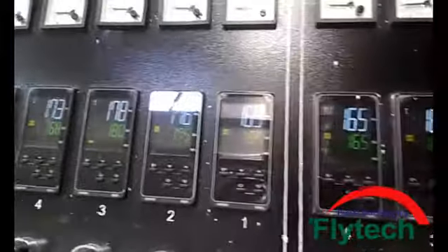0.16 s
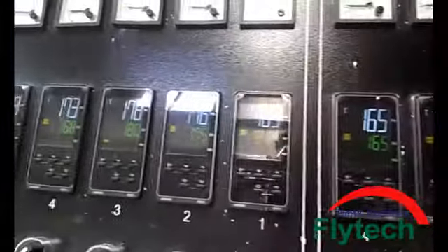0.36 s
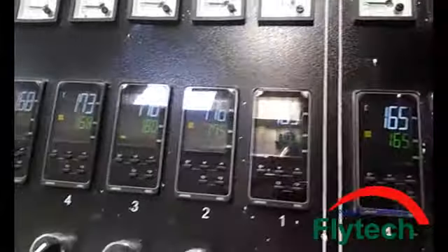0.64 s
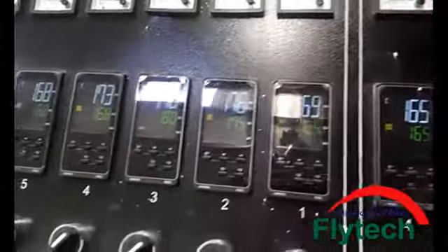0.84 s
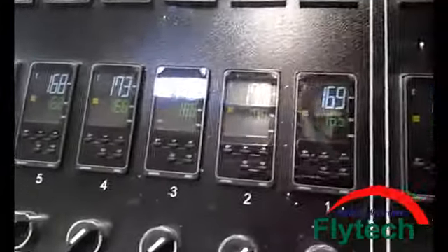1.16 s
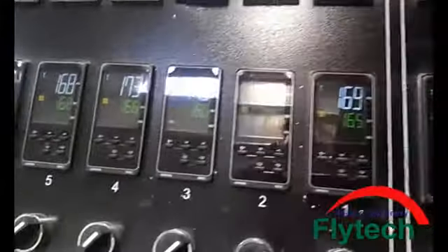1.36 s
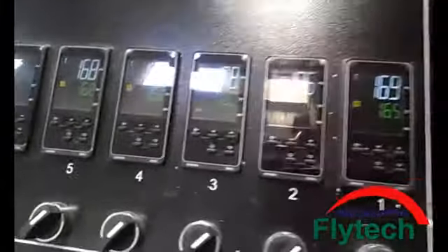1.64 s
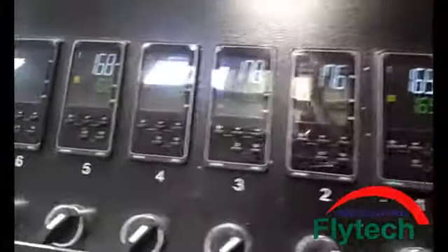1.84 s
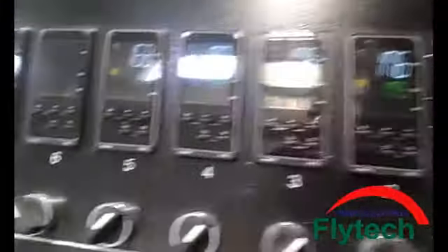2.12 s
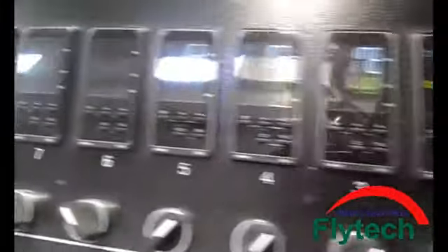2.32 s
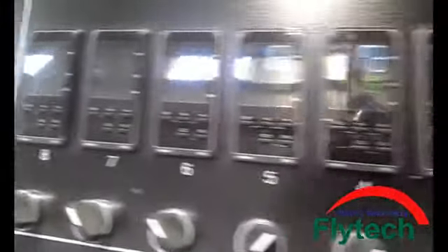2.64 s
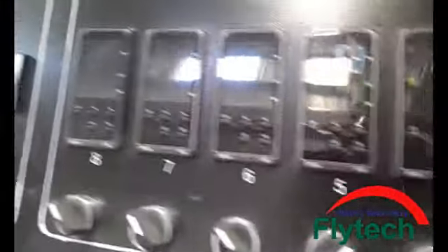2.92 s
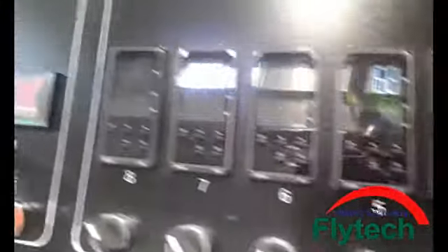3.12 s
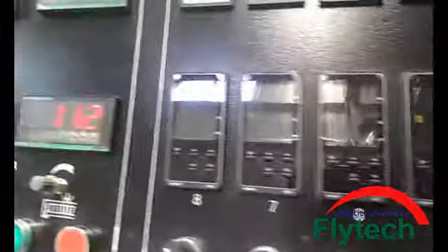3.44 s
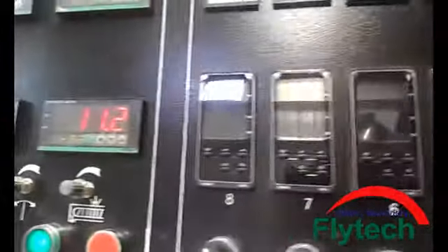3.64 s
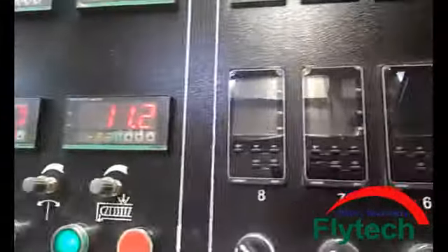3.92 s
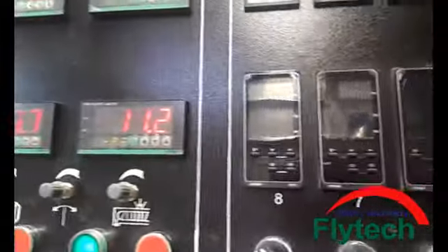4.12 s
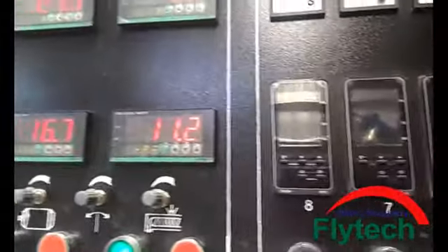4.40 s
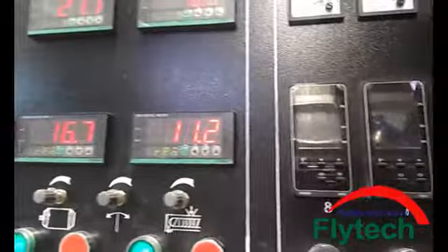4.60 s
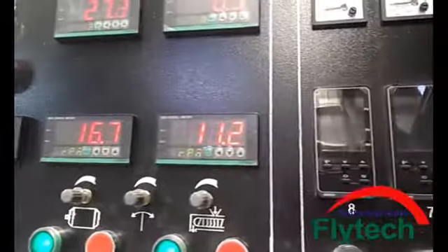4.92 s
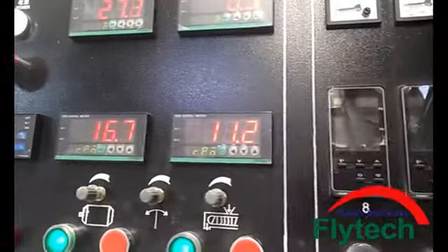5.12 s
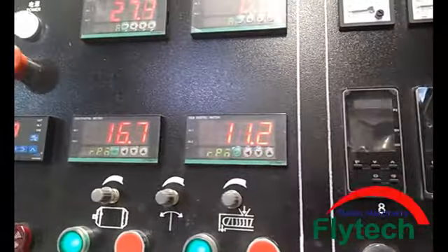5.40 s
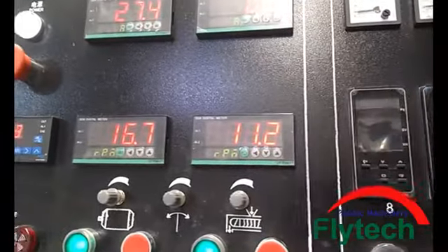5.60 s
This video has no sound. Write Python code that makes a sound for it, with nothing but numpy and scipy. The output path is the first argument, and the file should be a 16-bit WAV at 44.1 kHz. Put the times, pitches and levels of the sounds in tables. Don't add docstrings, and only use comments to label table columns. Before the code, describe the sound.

Continuous industrial noise without a break: a shrill, rough-edged motor whine around four kilohertz dominates, brighter on the right and duller on the left. Its strength ripples, faster once the camera speeds up midway, then more slowly. Fans and gears hum under it with a wide roar. A short, stuttering higher squeak comes close to the end. Camera microphone, slightly compressed, little extreme treble.

```python
import sys
import numpy as np
from scipy import signal
from scipy.fft import rfft, irfft
from scipy.io import wavfile
from scipy.ndimage import uniform_filter1d, minimum_filter1d, map_coordinates

SR = 44100
rng = np.random.default_rng(int(sys.argv[2]) if len(sys.argv) > 2 else 0)


def output_pcm(signal):
    pcm = np.clip(np.atleast_2d(signal).T, -1, 1) * 32767
    wavfile.write(sys.argv[1], SR, np.round(pcm).astype(np.int16))


def ratio_of_db(decibels):
    return 10 ** (np.asarray(decibels, float) / 20)


N = 253575
STEP = 256
T_S = np.arange(0, N, STEP) / SR

SWITCH_HZ, CYCLE_HZ = 4020.3, 42.39
# [order/cycles, left level/dB, right level/dB]
SIDEBANDS = [(-14, -62, -52), (-13, -59, -46), (-12, -55, -43), (-11, -57, -52), (-10, -49, -44),
             (-9, -50, -41), (-8, -58, -41), (-7, -51, -39), (-6, -39, -33), (-5, -47, -41), (-4, -43, -33),
             (-3, -42, -25), (-2, -40, -26), (-1, -35, -27), (0, -23, -18), (1, -40, -30), (2, -35, -21),
             (3, -43, -30), (4, -47, -40), (5, -39, -34), (6, -43, -34), (7, -50, -32), (8, -50, -36),
             (9, -47, -38), (10, -46, -41), (11, -51, -42), (12, -57, -44), (13, -52, -36), (14, -54, -45),
             (15, -53, -47)]
# [order/cycles, left level/dB, right level/dB]
ROTOR_SIDEBANDS = [(-10.25, -51, -46), (-7.25, -60, -45), (-6.75, -59, -46), (-6.25, -55, -46),
                   (-4.25, -52, -45), (-3.75, -54, -41), (-3.5, -61, -42), (-3.25, -52, -35),
                   (-2.75, -54, -36), (-2.5, -57, -39), (-2.25, -62, -42), (-1.75, -48, -36),
                   (-1.5, -49, -39), (-1.25, -42, -34), (-0.75, -39, -33), (-0.5, -48, -41),
                   (-0.25, -41, -35), (0.25, -44, -39), (0.5, -48, -41), (0.75, -50, -43), (1.25, -50, -38),
                   (1.5, -51, -37), (1.75, -43, -28), (2.25, -49, -31), (2.5, -53, -34), (2.75, -57, -41),
                   (3.25, -57, -45), (7.75, -61, -46), (8.25, -55, -42), (11.25, -55, -45)]
# [order/cycles, t/s, half-width/s, gain/dB]
NODES = [(0, 0.03, 0.22, -3), (0, 1.01, 0.19, -13), (0, 2.34, 0.09, -5), (0, 3.07, 0.055, -11),
         (0, 3.42, 0.075, -12), (0, 4.2, 0.07, -15), (0, 4.27, 0.57, -4), (2, 0.5, 0.17, -5),
         (2, 1.65, 0.24, -12), (2, 2.37, 0.07, -12), (2, 2.84, 0.08, -16), (2, 3.4, 0.09, -12),
         (2, 3.7, 0.5, -5), (2, 2.0, 0.07, -9), (2, 4.61, 0.27, -16), (2, 5.9, 0.46, -10),
         (1.75, 0.42, 0.31, -21), (1.75, 2.31, 0.18, -18), (1.75, 3.03, 0.29, -19),
         (1.75, 3.92, 0.14, -8), (1.75, 5.44, 0.41, -11), (-1, 0.12, 0.13, -18),
         (-1, 1.14, 0.49, -11), (-1, 2.22, 0.1, -18), (-1, 3.23, 0.2, -7), (-1, 4.36, 0.2, -17),
         (-1, 5.57, 0.29, -12), (-3, 0.15, 0.4, -19), (-3, 2.4, 0.15, -6), (-3, 3.05, 0.1, -9),
         (-3, 3.8, 0.4, -15), (-3, 4.63, 0.18, -11), (-3, 5.9, 0.53, -18),
         (-6, 0.87, 0.9, -14), (-6, 2.48, 0.1, -14), (-6, 3.23, 0.1, -8), (-6, 4.02, 0.1, -12),
              (-4, 0.93, 0.16, -15), (-4, 2.17, 0.1, -3), (-4, 3.84, 0.1, -10), (-4, 5.65, 0.13, -4),
              (-2, 0.8, 0.13, -16), (-2, 1.38, 0.12, -12), (-2, 2.33, 0.14, -6), (-2, 2.95, 0.2, -10),
              (1, 0.69, 0.14, -12), (1, 2.32, 0.9, -10), (1, 4.48, 0.2, -16), (1, 5.2, 0.35, -13),
              (1, 3.6, 0.08, -12), (3, -0.1, 0.2, -14), (3, 1.74, 0.34, -11), (3, 2.81, 0.1, -10),
              (3, 5.32, 0.25, -10), (5, 0.54, 0.62, -12), (5, 1.74, 0.17, -18), (5, 2.91, 0.19, -19),
              (5, 5.0, 0.9, -10), (7, 0.36, 0.23, -18), (7, 2.27, 0.87, -19), (7, 3.75, 0.18, -11),
              (7, 5.67, 0.74, -11), (6, 1.3, 1.1, -9), (6, 1.8, 0.12, -8), (6, 3.0, 0.12, -14),
              (6, 4.2, 0.1, -10), (6, 4.9, 0.6, -3), (8, 0, 0.35, -11), (8, 1.85, 0.3, -10),
              (8, 2.2, 0.1, -16), (8, 2.8, 0.1, -13), (8, 3.8, 0.25, -18), (8, 4.6, 0.15, -11),
              (8, 5.3, 0.4, -14), (13, 0.85, 0.15, -11), (13, 1.5, 0.35, -15), (13, 2.6, 0.1, -4),
              (13, 3.2, 0.1, -8), (13, 3.9, 0.15, -13), (13, 5.2, 0.55, -12), (-4, 3.0, 0.2, -6),
         (9, 1.5, .35, -5), (9, 2.9, .45, -11), (9, 5.3, .5, -8), (10, .4, .2, -7),
               (10, 1.9, .5, -17), (10, 3.4, .5, -16), (10, 5.4, .35, -11), (-5, 1.6, .1, -10),
               (-5, 2.55, .25, -13), (-5, 3.75, .25, -18), (-5, 4.6, .2, -10), (-5, 5.6, .3, -10),
               (4, .5, .25, -9), (4, 1.8, .6, -14), (4, 5.6, .3, -8), (2.25, 1.9, .55, -13),
               (2.25, 2.85, .12, -12), (2.25, 4.1, .15, -14), (2.25, 5.4, .4, -4), (-.75, .1, .15, -18),
               (-.75, .95, .25, -16), (-.75, 2.35, .1, -8), (-.75, 2.85, .1, -14), (-.75, 3.75, .25, -7),
               (-.75, 4.35, .1, -14)]
ALL_NODES = NODES
THROB_S = .955

# [f/Hz, left
# level/dB, right level/dB]
HUMS = [(165, -44, -44), (240.2, -41, -40), (329.9, -41, -39), (494.8, -39, -39), (1361.7, -42.5, -41.5),
        (2346, -52, -44.5), (3362, -43, -39.5), (4691, -49, -43), (7997, -62, -84), (8041, -71, -92),
        (144, -51, -51), (288, -49, -49), (433, -53, -53), (620, -50, -50), (722, -50, -50),
           (768, -49, -49), (877, -47, -47), (1076, -50, -49), (1124, -53, -52)]
# [f/Hz, t/s, half-width/s, gain/dB]
SHADOWS = [(165, 2.7, .2, -3), (165, 1.6, .12, -8), (165, 3.3, .5, -3), (240.2, .6, .3, -9),
           (240.2, 1.2, .15, -8), (240.2, 2.0, .12, -5), (240.2, 2.7, .15, -7), (240.2, 3.65, .12, -5),
           (240.2, 4.0, .09, -14), (240.2, 5.5, .35, -9), (329.9, .2, .3, -4), (329.9, 1.0, .12, -5),
           (329.9, 1.8, .6, -6), (329.9, 2.87, .25, -6), (329.9, 3.7, .2, -4), (329.9, 5.36, .2, -12),
           (494.8, .1, .45, -6), (494.8, 1.25, .2, -6), (494.8, 2.1, .55, -9), (240.2, 2.2, .2, -3),
           (240.2, 4.9, .3, -3), (877, .1, .2, -16), (877, 1.2, .25, -12), (877, 2.2, .6, -18),
           (877, 4.9, .7, -20), (494.8, 2.5, .12, -3), (494.8, 4.0, .15, -3), (1361.7, 0, .45, -7),
           (1361.7, 2.45, .6, -9), (1361.7, 4.55, .1, -5), (1361.7, 5.4, .6, -3), (3362, .1, .9, -14),
           (3362, 1.9, .25, -20), (3362, 2.8, .22, -14), (3362, 3.45, .3, -14), (3362, 3.95, .25, -18),
           (3362, 5.55, .25, -12), (4691, .5, .5, -11), (4691, 1.3, .2, -6), (4691, 2.4, .5, -9),
           (4691, 3.6, .3, -9), (4691, 5.35, .45, -11), (7997, 1.6, .4, -8), (7997, 3.6, .3, -4),
           (7997, 5.2, .35, -13), (7997, .35, .12, -9), (7997, 1.1, .1, -6), (7997, 4.0, .1, -8)]
BEAT_HZ, BEAT_S, BEAT_DEPTH = 2.95, 3.52, .42

SQUEAK_HZ, SQUEAK_DB, SAG_HZ_PER_S = 5868, -39, 90
SQUEAK_S, SWELL_S, HOLD_S, DIE_S = 4.92, .06, .39, .025
# [f/Hz, t/s, half-width/s, gain/dB]
SLIPS = [
    (5868, 4.99, .012, -14),
    (5868, 5.078, .01, -12),
    (5868, 5.122, .008, -10),
    (5868, 5.17, .011, -14),
    (5868, 5.218, .005, -8),
    (5868, 5.272, .008, -14),
    (5868, 5.31, .02, -5),
    (5868, 5.22, .035, 2),
    (5868, 5.365, .015, 2),
    (5868, 5.035, .006, -7),
]

# [f/Hz, left density/dB, right density/dB]
DRONE = [(20, -45.5, -43.5), (40, -33.5, -34.5), (60, -30.5, -33.5), (77, -24.5, -28), (96, -12.5, -12),
         (118, -23.5, -22), (147, -5, -4.5), (250, -2, -2), (466, -6.5, -4.5), (594, -0.5, -1.5),
         (1040, -6, -3.5), (1510, -9.5, -10), (3000, -41, -36.5), (6000, -120, -120)]
# [f/Hz, left density/dB, right density/dB]
AIR = [(300, -120, -120), (800, -23.5, -25), (1240, -12, -4), (2010, -2.5, 4.5), (2770, -5.5, -0.5),
       (3400, -14.5, -5), (4130, -29.5, -21.5), (6000, -120, -120)]
# [f/Hz, left density/dB, right density/dB]
HOUSING = [(1500, -120, -120), (2600, -27.5, -20), (3260, -20, -10.5), (3750, -16, -6.3),
           (3904, -11.5, 0.5), (4150, -12.5, -1.5), (4290, -14.8, -3.6), (4665, -16.5, -5.8),
           (5124, -21.5, -13.5), (5800, -25.5, -21), (6300, -31.5, -30), (6930, -34.5, -36.5),
           (7500, -41, -41), (7960, -34.5, -38.5), (8160, -41.5, -42)]
DRONE_DB, AIR_DB, HOUSING_DB = -29, -31, -26.8
DRONE_FOLLOWS, HOUSING_FOLLOWS = 0.97, 0.84
FLOOR_HZ = 190

# [t/s, speed/(m/s)]
WALK = [
    (0, .04),
    (2, .06),
    (2.4, .18),
    (3.7, .18),
    (4.3, .09),
    (5.75, .04),
]
# [t/s, gain/dB]
GAIN = [(0, -2), (.3, -1), (.75, 0.26), (1.25, 0), (1.65, -2.5), (1.98, -0.5), (2.18, -2), (2.4, 2),
        (2.6, -2), (2.9, -3.5), (3.15, 2), (3.55, 3), (3.8, -0.5), (4.25, 3.5), (4.6, 1.8), (5.1, 1),
        (5.4, 0), (5.75, 0)]
# [f/Hz, left-right likeness]
ALIKE = [(25, .6), (60, 0.95), (170, 1), (350, 0.84), (700, 0.62), (1030, 0.24), (1500, 0.029),
         (1900, 0.14), (2500, 0.39), (3500, 0.37), (4300, 0.34), (5500, 0.19), (6200, 0.11)]
# [f/Hz, share of right]
ECHO = [(300, .02), (600, .07), (1000, .17), (1500, .38), (2600, .43), (4000, .64), (5100, .46),
        (6000, .15)]
ECHO_S = .004608

# [from f/Hz, to f/Hz, left sounding share, right sounding share]
SPARSE = [(5860, 6030, .99, .97), (6030, 6200, .97, .86), (6200, 6370, 1, .8), (6370, 6890, .85, .68),
          (6890, 7580, .29, .12), (7580, 8270, .6, .05), (8270, 22050, 0, 0)]
# [f/Hz, share of band power]
RAGGED = [(5600, .05), (6000, .2), (6400, .5), (7000, .7), (8000, .24)]
# [band from f/Hz, t/s, half-width/s, bias/dB]
BUSY = [(7580, .35, .02, -30), (7580, 1.27, .045, -40), (7580, 1.39, .012, 8), (7580, 2.05, .08, 14),
        (7580, 5.09, .035, 35), (6890, .07, .02, 20), (6890, .72, .02, 16), (6890, 4.95, .06, 8),
        (7580, 1.52, .05, -40), (7580, 2.65, .1, 10), (6890, 2.76, .08, 22), (6890, .97, .04, 14),
        (7580, 1.89, .05, -40), (7580, 2.35, .06, -40), (7580, 2.9, .07, -40), (7580, 3.21, .035, -30),
        (7580, 4.13, .035, -30), (7580, 4.25, .03, -25), (7580, 5.32, .14, -40), (6890, .3, .35, -12),
        (6890, 1.6, .45, -14), (6890, 2.52, .06, -14), (6890, 2.95, .07, -14), (6890, 5.4, .25, -20),
        (6370, .25, .04, -20), (6370, .47, .09, -9), (6370, 1.63, .04, -18), (6370, 1.86, .03, -14),
        (6370, 2.58, .02, -14), (6370, 5.28, .07, -30), (6370, 5.1, .06, -2), (6200, 5.2, .2, -16),
        (6200, .2, .04, -14), (6030, 5.1, .07, -12), (7580, 4.45, .12, 9), (7580, .07, .04, 8),
        (7580, .26, .015, -20), (7580, 4.85, .012, -20), (7580, 5.02, .012, -25), (7580, 5.54, .03, 25),
        (7580, 5.63, .018, -30), (7580, 5.73, .02, -30), (6890, 3.47, .08, 10), (6890, 4.25, .1, 10),
        (5860, 5.47, .03, -20), (6030, 5.47, .04, -20)]
# [t/s, level/dB]
OVERLOADS = [
    (.858, -56),
    (1.725, -67),
    (4.178, -68),
    (4.958, -77),
]
# [f/Hz, level/dB]
CONVERTER = [(11880, -99), (15700, -105)]
CEILING = .93


def whine():
    loud = {row[0] for row in ALL_NODES}
    nearness = unit(ratio_of_db(HOUSING_FOLLOWS * curve(GAIN, T_S)))
    blur = 1j * np.clip(T_S - 1.2, .3, 1.8)
    drift_s = np.clip(0.068 * (T_S - 1), 0, .03)
    throb_gain = np.interp(T_S, [.45, .75, 1.25, 1.5, 4.4], [.6, 1.15, 1.15, .75, .6])
    lines, turns = [], {}
    for order, left_db, right_db in SIDEBANDS + ROTOR_SIDEBANDS:
        hz = SWITCH_HZ + order * CYCLE_HZ
        gain = nearness * standing(hz, direct=0.33)
        turns[order] = np.exp(1.5j * wobble(1.189 * T_S))
        parent = round(order)
        offset = order - parent
        if abs(offset) == .25 and parent in loud:
            throb = np.exp(-2j * np.pi * offset * CYCLE_HZ * (THROB_S + drift_s) + blur * wobble(1.0 * T_S))
            turns[order] = turns[parent] * throb
            gain = np.abs(gain) * turns[order] * throb_gain
        if order in loud:
            depth = .12 if left_db - right_db > -8 else .3
            left = 1 + depth * (wobble(7.4 * T_S) + 1j * wobble(1.6 * T_S))
            ports = np.array([unit(left), np.ones(len(T_S))])
            gain = ports * turns[order] * fading(ALL_NODES, order)
        lines.append((hz, gain * lead(hz) * ratio_of_db([[left_db + 1.0], [right_db + 0.55]])))
    return tones(lines)


def hums():
    lifted = unit(ratio_of_db(curve(GAIN, T_S)))
    shaded = {row[0] for row in SHADOWS}
    lines = []
    for hz, left_db, right_db in HUMS:
        if hz in shaded:
            gain = fading(SHADOWS, hz) * standing(hz, direct=.99)
        else:
            gain = lifted * standing(hz, direct=.7)
        if round(hz) == 495:
            gain = gain * (1 + BEAT_DEPTH * np.exp(2j * np.pi * BEAT_HZ * (T_S - BEAT_S)))
        level_db = np.array([[left_db + 1.0], [right_db + 1.5]]) - 350 / hz
        lines.append((hz, gain * lead(hz) * ratio_of_db(level_db)))
    return tones(lines)


def squeak():
    since_s = T_S - SQUEAK_S
    shape = np.interp(since_s, np.cumsum([0, SWELL_S, HOLD_S, DIE_S]), [0, .7, 1.2, 0])
    rough = (1.7 + 0.25 * wobble(90 * T_S)) * np.exp(1.1j * wobble(60 * T_S))
    sag = np.exp(-1j * np.pi * SAG_HZ_PER_S * since_s ** 2 * (shape > 0))
    gain = shape * rough * fading(SLIPS, SQUEAK_HZ) * sag
    return tones([(SQUEAK_HZ, gain * ratio_of_db(SQUEAK_DB + np.array([[-10], [1.5]])))])


def roar():
    gain_db = curve(GAIN, np.arange(N) / SR)
    drone = ratio_of_db(DRONE_DB) * rush(DRONE, patchy_db=0.6)
    floor = signal.sosfiltfilt(signal.butter(2, FLOOR_HZ, fs=SR, output="sos"), drone)
    drone = floor + ratio_of_db(DRONE_FOLLOWS * gain_db) * (drone - floor)
    air = ratio_of_db(AIR_DB + gain_db) * rush(AIR, patchy_db=0.75)
    housing = ratio_of_db(HOUSING_DB + HOUSING_FOLLOWS * gain_db) * rush(HOUSING, patchy_db=1.5)
    return drone + air + housing


def rush(spectrum, patchy_db):
    z = signal.stft(rng.standard_normal((2, N)), nperseg=512)[2]
    field = uniform_filter1d(rng.standard_normal(z.shape[1:]), size=6, axis=0)
    field = uniform_filter1d(field, size=14, axis=1)
    pair = rfft(signal.istft(z * ratio_of_db(patchy_db * unit(field)), nperseg=512)[1][:, :N])
    hz = np.fft.rfftfreq(N, 1 / SR)
    turn = np.arccos(np.clip(along(ALIKE, hz)[0], -1, 1)) / 2
    mid, side = pair * [np.cos(turn), np.sin(turn)]
    late = echo(hz)
    right = mid - side
    left = np.sqrt(1 - np.abs(late) ** 2) * (mid + side) + late * right
    ports = irfft(ratio_of_db(along(spectrum, hz)) * [left, right], N)
    return ports / np.std(ports.mean(axis=0))


def standing(hz, direct, grain=2.6):
    metres = np.cumsum(curve(WALK, T_S)) * STEP / SR
    position = grain * metres * hz / 343 + .8 * T_S
    shared, own = [unit(wobble(position) + 1j * wobble(position)) for _ in range(2)]
    like = np.clip(along(ALIKE, hz)[0], .88, 1)
    echoes = np.array([like * shared + np.sqrt(1 - like ** 2) * own, shared])
    direct = np.clip(direct, 0, 1)
    gain = direct + np.sqrt(1 - direct ** 2) * echoes
    gain = gain * np.exp(2j * np.pi * rng.random())
    return np.array([unit(g) for g in gain])


def echo(hz):
    return -along(ECHO, hz)[0] * np.exp(-2j * np.pi * hz * ECHO_S)


def lead(hz):
    return [[np.exp(1j * np.angle(along(ALIKE, hz)[0] + echo(hz)))], [1]]


def fading(events, key):
    gain_db = np.zeros(len(T_S))
    for k, s, width_s, db in events:
        if k == key:
            gain_db += db * np.exp(-.5 * ((T_S - s) / width_s) ** 2)
    return unit(ratio_of_db(gain_db))


def tones(lines):
    size = N // STEP + 64
    spectrum = np.zeros((2, size * STEP // 2 + 1), complex)
    for hz, gain in lines:
        slow = np.pad(gain, ((0, 0), (0, size - gain.shape[1])), "reflect")
        start = round(hz * size * STEP / SR) - size // 2
        shifted = np.fft.fftshift(np.fft.fft(slow), axes=1)
        spectrum[:, start:start + size] += shifted * np.hanning(size)
    return irfft(spectrum)[:, :N] * STEP / np.sqrt(2)


def wobble(position):
    return map_coordinates(rng.standard_normal(int(position[-1]) + 4), [position])


def curve(rows, t_s):
    return np.interp(t_s, *np.transpose(rows))


def along(points, hz):
    f, *cols = np.transpose(points)
    return np.array([np.interp(np.log(hz + 1), np.log(f + 1), c) for c in cols])


def unit(x):
    return x / np.sqrt(np.mean(np.abs(x) ** 2) + 1e-20)


def scene():
    return whine() + hums() + squeak() + roar()


def limiter(x):
    need = np.minimum(1, CEILING / (np.abs(x) + 1e-9))
    return x * uniform_filter1d(minimum_filter1d(need, size=257), size=129)


def sparse_top(x):
    hz, t, z = signal.stft(x, SR, nperseg=2048)

    def level_db(port, band):
        return 10 * np.log10(np.mean(np.abs(port[band]) ** 2, axis=0) + 1e-20)

    maskers = [level_db(port, (hz > 5700) & (hz < 6000)) for port in z]
    for lo, hi, *shares in SPARSE:
        band = (hz >= lo) & (hz < hi)
        busy_db = 20 * np.log10(np.interp(t, T_S, fading(BUSY, lo)))
        for port, masker_db, share in zip(z, maskers, shares):
            worth_db = 2 * level_db(port, band) - masker_db + busy_db
            worth_db = worth_db + 2.2 * wobble(6 * t) + 2.2 * wobble(18 * t)
            power = np.abs(port[band]) ** 2
            proud = uniform_filter1d(power, size=4, axis=0) > along(RAGGED, lo)[0] * power.mean(axis=0)
            port[band] *= proud * (worth_db >= np.quantile(worth_db, 1 - share))
    return signal.istft(z, SR, nperseg=2048)[1][:, :N]


def converter():
    x = np.zeros((2, N))
    for s, db in OVERLOADS:
        hiss = np.diff(rng.standard_normal(1202), 2)
        x[1, round(s * SR) + np.arange(-600, 600)] = ratio_of_db(db) * np.hanning(1200) * hiss
    return x + tones([(hz, ratio_of_db(db) * standing(hz, direct=.3, grain=9)) for hz, db in CONVERTER])


def band_limit(x):
    return signal.sosfilt(signal.butter(12, 15700, fs=SR, output="sos"), x)


def record(dry):
    mix = sparse_top(limiter(dry)) + converter()
    return band_limit(mix)


dry = scene()
out = record(dry)
output_pcm(out)
```